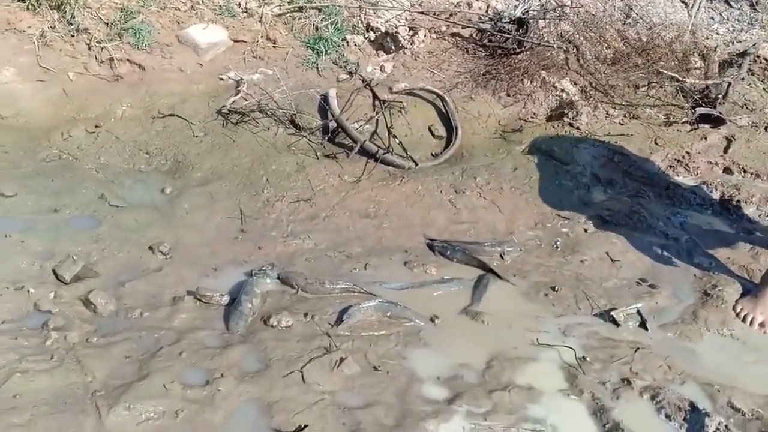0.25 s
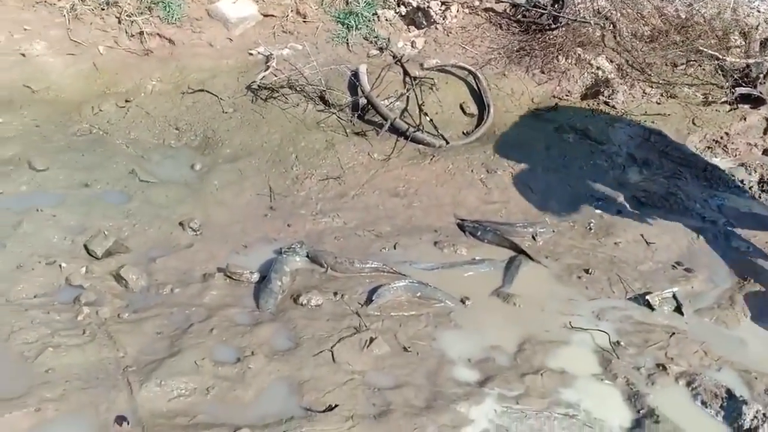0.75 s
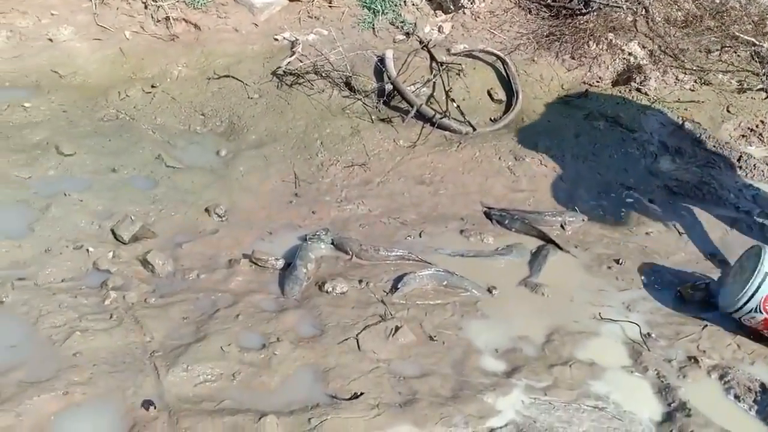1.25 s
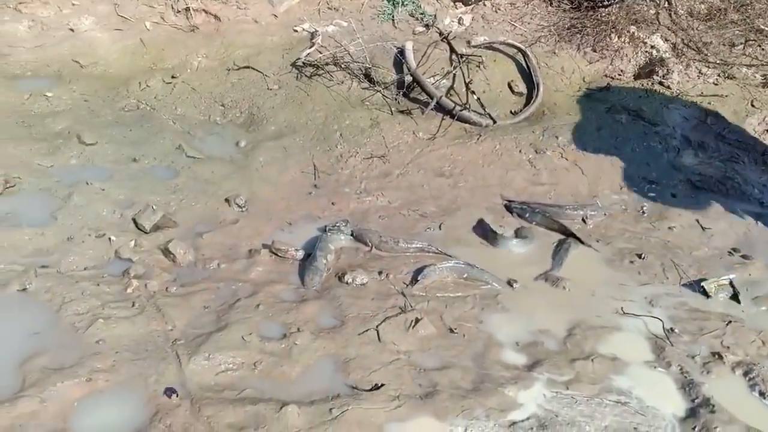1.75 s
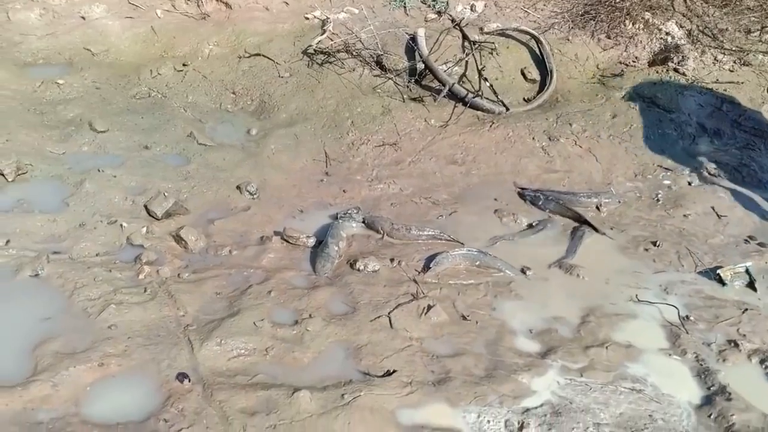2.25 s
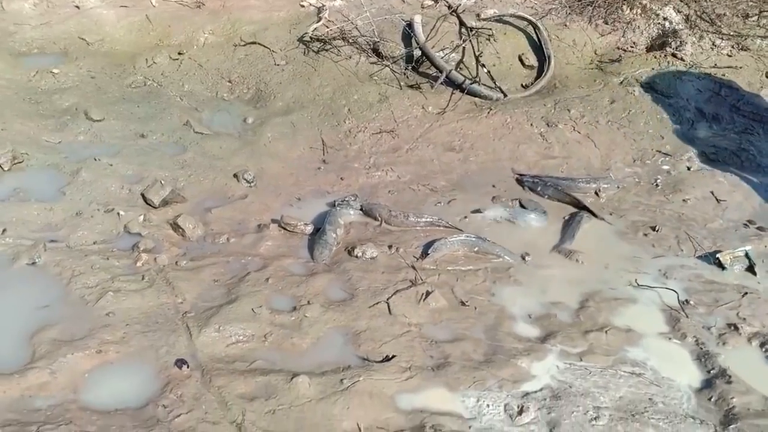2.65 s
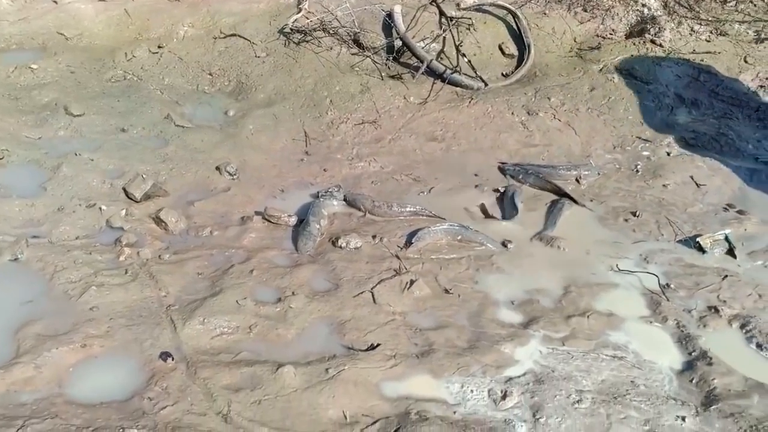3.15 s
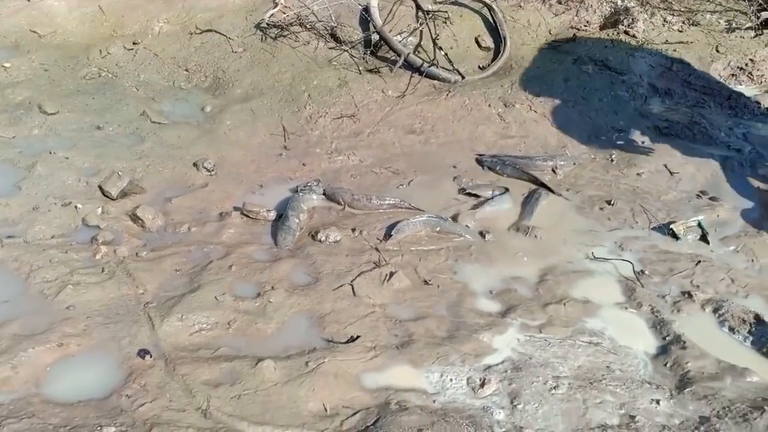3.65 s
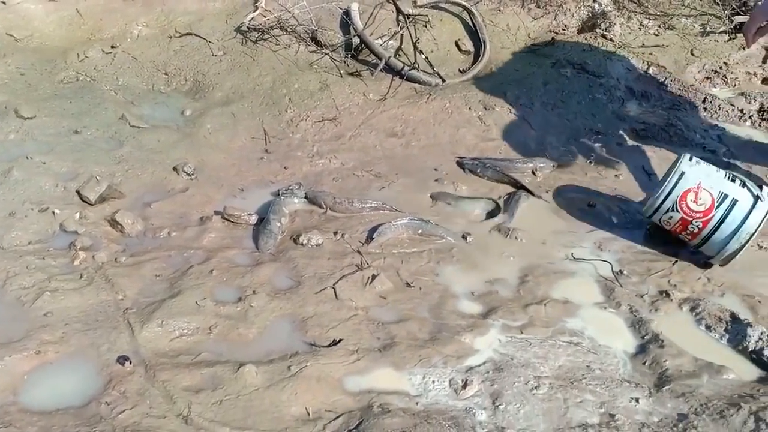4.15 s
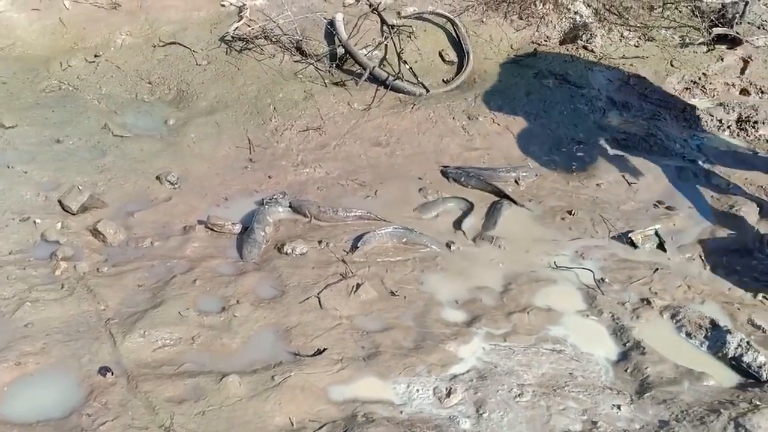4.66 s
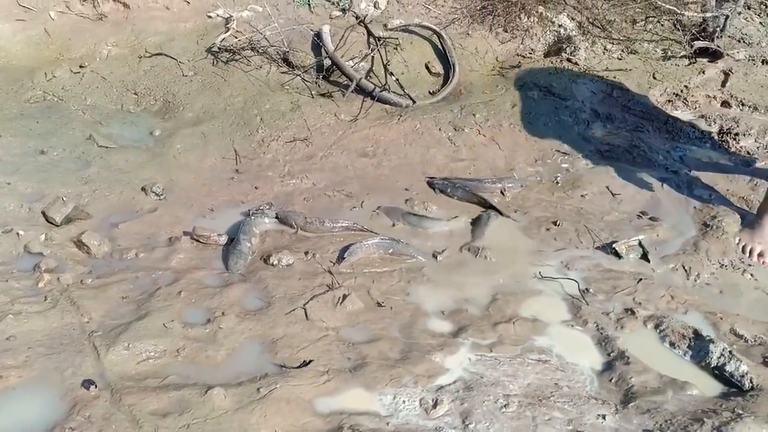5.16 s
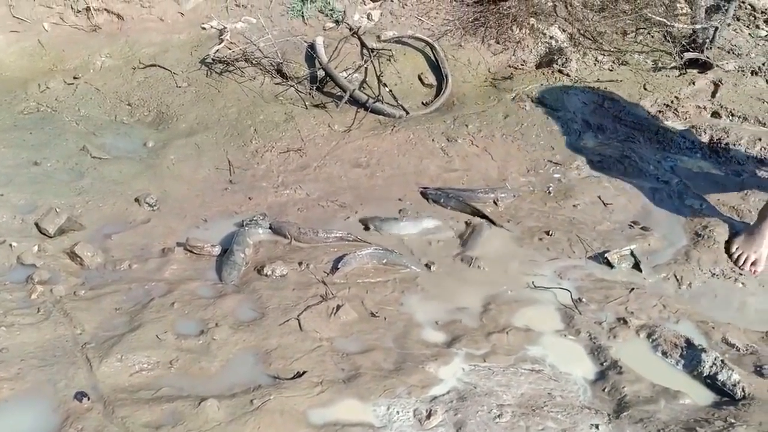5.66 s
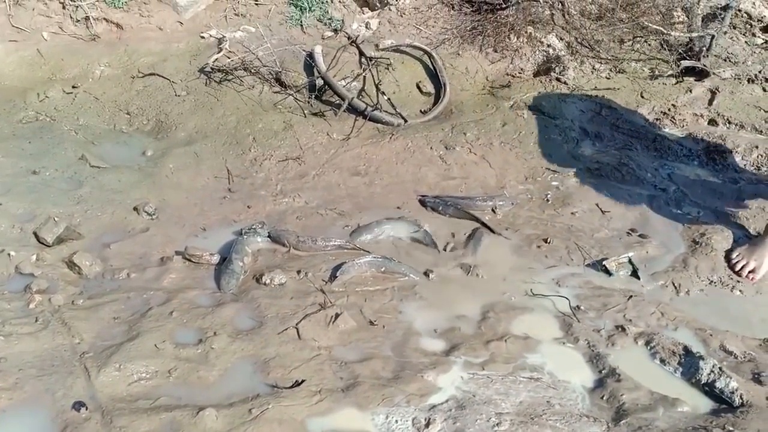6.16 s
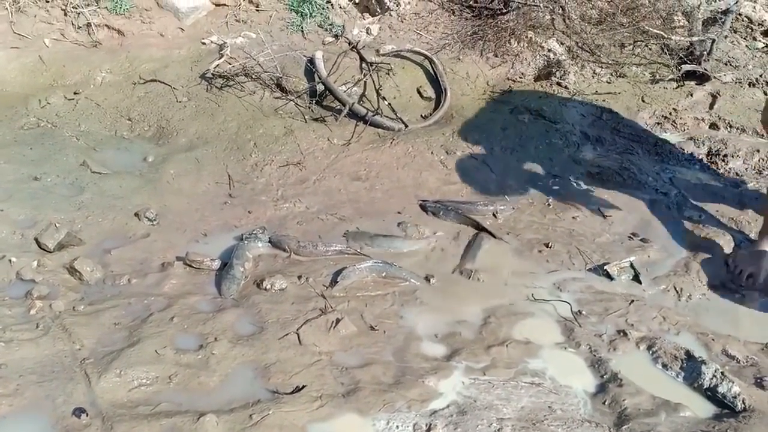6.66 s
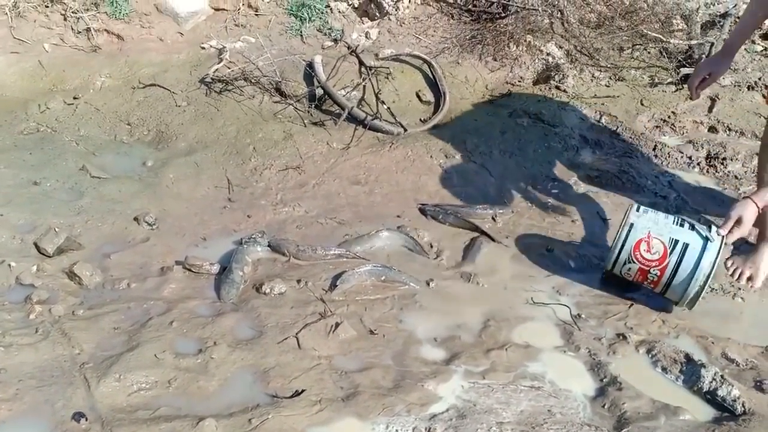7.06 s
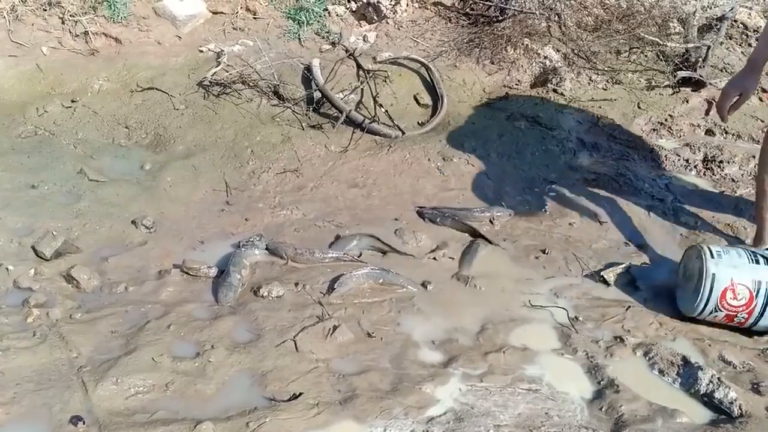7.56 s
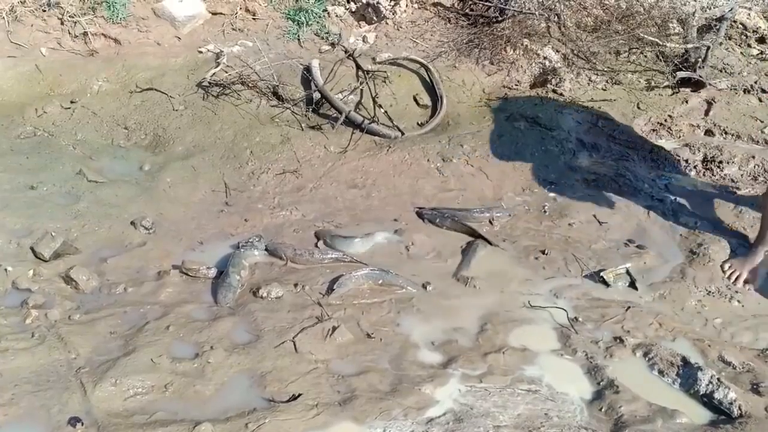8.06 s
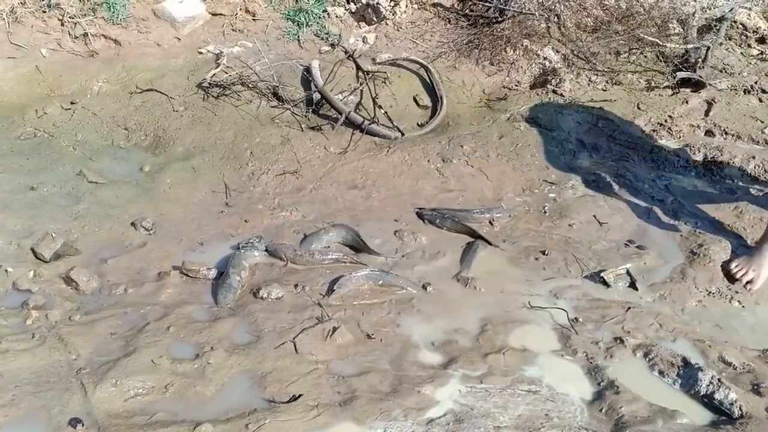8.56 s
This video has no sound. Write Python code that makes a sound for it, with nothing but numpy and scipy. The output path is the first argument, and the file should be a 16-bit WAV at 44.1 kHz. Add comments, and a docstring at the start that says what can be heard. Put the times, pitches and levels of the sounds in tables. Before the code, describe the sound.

Outdoors beside a muddy puddle, a plastic bucket slaps in, scrapes and gurgles as it fills, then throws its water, which patters onto wet mud. The cycle comes three times, about three seconds apart, with single drops and bubble plops between. The last scoop is softer. A close stereo microphone hears the water slightly to the right, with low distant rumble and light wind beneath.

```python
"""Bailing a muddy puddle

A plastic bucket slaps in, scrapes and gurgles full, then flings water that patters down: shaped noise and bubble rings.
Drops tick (treble noise bursts) and bubbles plop (climbing sines) between throws.
Far rumble, drone, light wind on the ports (filtered noise) and one faint bird (gliding sine) lie beneath.
The water is nearer the right microphone port, so the left one hears it later."""
import sys
import numpy as np
from scipy import signal
from scipy.fft import rfft, irfft
from scipy.io import wavfile
from scipy.ndimage import uniform_filter1d, map_coordinates

SR = 44100
rng = np.random.default_rng(int(sys.argv[2]) if len(sys.argv) > 2 else 0)


def materialize(psi):
    """Save the field psi as 16-bit PCM at rate SR to the path in sys.argv[1].

    A 1-D psi becomes a single channel; in a 2-D psi each row is a channel.
    """
    bounded = np.clip(np.atleast_2d(psi).T, -1, 1)
    quanta = np.round(bounded * 32767).astype(np.int16)
    wavfile.write(sys.argv[1], SR, quanta)


N = 388080

# Table levels are nominal: layer trims and filters follow.
# background levels: time_s, wind_db, rumble_db, drone_db
AIR_LEVELS = [(0.0, -80, -53, -58), (0.34, -72, -57, -66), (0.7, -65.5, -61.5, -66), (1.1, -74, -59, -66),
              (1.5, -82, -55, -59), (2.06, -81, -58, -66.5), (2.77, -65.5, -57, -61),
              (3.4, -66.5, -53.5, -63), (3.6, -62, -51.5, -61), (3.95, -66, -45.5, -59.5),
              (4.3, -60, -50.5, -57), (5.15, -55, -54, -65), (5.5, -60, -58, -64), (5.78, -53, -52, -63),
              (6.1, -59.5, -56, -60.5), (6.55, -61.5, -51.5, -63), (6.85, -71.5, -48, -64),
              (7.25, -65.5, -50.5, -60), (7.8, -62.5, -52, -65.5), (8.2, -59.5, -56, -65.5),
              (8.45, -56, -57, -66.5), (8.8, -60, -52, -64.5)]
# wind spectrum: freq_hz, gain_db
WIND_SPECTRUM = [(20, -25), (40, -10), (70, 12), (110, 10), (160, 2.5), (300, -50)]
# far rumble spectrum: freq_hz, gain_db
RUMBLE_SPECTRUM = [(50, -9), (110, 2.5), (200, 2.5), (270, -2.5), (350, -15.5), (600, -43)]
# far drone spectrum: freq_hz, gain_db
DRONE_SPECTRUM = [(200, -41), (350, -0.5), (600, -1.5), (800, -8.5), (1100, -21), (2200, -22.5),
                  (4000, -25.5), (8000, -22), (16000, -19)]
# bird whistle track: time_s, pitch_hz, level_db
BIRD_TRACK = [(6.715, 2920, -92), (6.73, 2890, -63), (6.84, 2835, -64.5), (6.855, 2850, -95)]
# big bubbles: start_s, level_db, pitch_hz, climb_share (after 19 ms), t60_s
PLOPS = [(1.172, -35, 590, 0.05, 0.04), (1.472, -37.5, 775, 0.05, 0.04), (1.497, -35, 750, 0.05, 0.05),
         (1.642, -34.5, 790, 0.05, 0.04), (1.69, -47, 750, 0.05, 0.04), (3.14, -51, 980, 0.11, 0.057),
         (3.637, -27, 1010, 0.23, 0.046), (6.0, -41.5, 620, 0.05, 0.11), (6.1, -42, 700, 0.05, 0.04),
         (3.775, -56, 1460, 0.094, 0.042), (6.2, -32, 1250, 0.52, 0.029), (6.617, -49, 1100, 0.13, 0.071),
         (7.173, -32.5, 630, 0.087, 0.059), (7.22, -36, 616, 0.12, 0.038),
         (7.389, -39.5, 1050, 0.12, 0.043), (7.478, -49.5, 1155, 0.27, 0.081),
         (7.603, -32.5, 1182, 0.047, 0.064), (7.866, -50, 1320, 0.19, 0.046)]
# bucket rim bumping the mud: start_s, level_db
THUDS = [(1.122, -34), (1.758, -38)]
# air glugging in the bucket's mouth: start_s, level_db, pitch_hz, t60_s
GLUGS = [(1.117, -20.5, 306, 0.041), (1.201, -32, 306, 0.033), (1.497, -42, 330, 0.034),
         (1.703, -22.5, 437, 0.021), (1.752, -18.5, 325, 0.033), (1.762, -32, 367, 0.024),
         (1.863, -42, 284, 0.036), (2.309, -39, 340, 0.036), (2.896, -34.5, 327, 0.035),
         (4.045, -28, 380, 0.02), (4.249, -30, 480, 0.022), (4.688, -33.5, 330, 0.043),
         (4.705, -40, 354, 0.076)]
# clear single small bubbles: start_s, level_db, pitch_hz
POPS = [(0.709, -32.5, 2120), (1.092, -32, 5840), (1.114, -17, 1770), (1.616, -38.5, 1900),
        (1.676, -39, 2030), (1.704, -26.5, 2010), (4.243, -11, 2400), (4.557, -13.5, 4130),
        (4.644, -30.5, 4100), (4.692, -43, 1810), (4.773, -38, 2280), (4.789, -40.5, 1950),
        (4.837, -47, 1880), (4.906, -50, 2000), (5.246, -40.5, 1910), (7.011, -31, 2340),
        (7.047, -32, 2150), (7.232, -31, 2260), (7.262, -31, 1660), (7.658, -40, 2060), (7.748, -43, 2230),
        (7.857, -47.5, 1940)]
# water running into or draining from the bucket:
# start_s, level_db, hold_s, drift_db_per_s, gurgle_re_level_db
SCOOPS = [(1.12, -48, 0.53, -14.5, -5.5), (4.05, -48.5, 0.077, -17, -10), (4.3, -55.5, 0.49, -26, -10),
          (4.62, -71, 0.19, -10, -5), (7.01, -57, 0.42, -4.5, -5), (7.5, -57, 0.26, -19, -7.5)]
# flung water falling: start_s, level_db, hold_s, drift_db_per_s, tinkle_re_level_db
FLINGS = [(-0.4, -51.5, 0.7, -9, -3), (2.5, -56.5, 0.48, 14.5, -3.5), (5.52, -51, 0.39, -12.5, -1.5),
          (8.53, -55, .3, 2, -2.5)]
# steady trickle, one value per layer: patter_db, tinkle_db, fizz_db, gurgle_db
TRICKLE_LEVELS_DB = (-71, -79.5, -83.5, -75.5)
# bucket or foot slapping the puddle:
# start_s, level_db, hollow_re_level_db, gulp_re_level_db, spit_re_level_db, t60_s
SLAPS = [(0.709, -32.5, -17, -13, -25.5, 0.069), (0.716, -29.5, -18, -9.5, -10.5, 0.1),
         (1.066, -42, -26, -16, -3, 0.091), (1.09, -15, -23, -9, -4, 0.038),
         (1.106, -14.5, -12.5, -13, -26, 0.1), (1.202, -35, 2.5, -2.5, -31, 0.045),
         (1.223, -23.5, -23, -15, -39, 0.17), (1.338, -28, -19, -17.5, -20.5, 0.25),
         (1.436, -29.5, -19, -16, -16, 0.06), (1.45, -21.5, -39, -36, -14.5, .04),
         (1.464, -29.5, -22, -21, -9, .093), (1.494, -38, -2.5, -9, -2, 0.069),
         (1.539, -30.5, -11, -13, -8.5, 0.079), (1.17, -49, 8, -11, -25, 0.089),
         (1.616, -45.5, 9.5, 2, -28, 0.037), (1.639, -39, -8, -9, -11, 0.043),
         (1.676, -34.5, -13, -10, -21, 0.077), (1.704, -31, 2.5, -11, -34, 0.047),
         (1.752, -26.5, -1, -25, -20, 0.029), (1.76, -41, 8, -17, -20, 0.14),
         (2.363, -38, -14, -17, -31, 0.05), (3.192, -44.5, -3, -7, 3.5, 0.086),
         (3.441, -26, -22, -17, -21, 0.054), (3.45, -33.5, -18, -16, -11.5, 0.14),
         (3.67, -38.5, -17, -22, -10, 0.074), (4.035, -22, -16, -10, -7.5, 0.15),
         (4.044, -24, 0, -1, -9, 0.023), (4.154, -36.5, -24, -1, -27, 0.028),
         (4.175, -30.5, -22, -31, -14, .05), (4.231, -25.5, -8, -10, -7, 0.025),
         (4.243, -11.5, -19, -9.5, -11, 0.025), (4.25, -22, -16, -11, -21, 0.089),
         (4.331, -34, -23, -9, -18, .2), (4.381, -31, -25, -6, -30, 0.059),
         (4.416, -27.5, -17, -5.5, -10.5, 0.032), (4.44, -36, -21, -24, -7, 0.064),
         (4.511, -40, -34, -29, -1.5, .065), (4.53, -23.5, -28, -15.5, -4.5, .11),
         (4.556, -32, -7, -10, -6, 0.032), (3.488, -47, -7, -2, -33, 0.1),
         (8.195, -50, -21.5, -15, -17, 0.11), (5.245, -45, -18.5, -12, -5, 0.048),
         (6.401, -30.5, -16.5, -9.5, -25.5, 0.13), (7.009, -25, -16, -11, -4, 0.037),
         (7.019, -31.5, -18, -6, -8.5, 0.15), (7.046, -36, -14.5, -2, -40, 0.095),
         (7.144, -37.5, -19, -4.5, -10.5, 0.15), (7.172, -35, -6, -6, -12, 0.14),
         (7.214, -31, -18, -11, -15.5, 0.16), (7.26, -30.5, -26, -11.5, -2.5, .099),
         (7.315, -27.5, -33, -25, -27, 0.11), (7.344, -35.5, -37, -8.5, -15, 0.22),
         (7.388, -48, -25, -6, -22, 0.055), (7.473, -39.5, -27, -9, -13, 0.062),
         (7.578, -43, -25, -21, -4, .1), (7.442, -37.5, -20, -12, -35, 0.04),
         (7.527, -39.5, -16, -15.5, -8.5, 0.1), (7.293, -36, -24, -11, -8, 0.11),
         (7.544, -33.5, -30, -29, -9.5, 0.34), (7.599, -27, -9, -7.5, -35, 0.1),
         (7.686, -35.5, -9.5, -12, -26, 0.17)]
# biggest flung blobs landing: start_s, level_db, pop_hz, spit_re_level_db, t60_s
BLOBS = [(0.279, -41.5, 2550, 2, .03), (0.354, -34.5, 2970, -9, 0.05), (0.382, -48.5, 2560, 7.5, 0.095),
         (2.537, -40.5, 2220, -11, 0.07), (2.637, -30, 3040, -18, 0.02), (2.725, -43.5, 2440, -3, .1),
         (2.76, -32, 2040, -31, .05), (2.788, -39, 2400, -29, 0.065), (2.813, -40, 2290, -17, .07),
         (2.856, -34.5, 2040, -28, 0.04), (2.897, -30, 1680, -25, 0.13), (2.931, -28.5, 2220, -16.5, 0.37),
         (2.957, -26.5, 2220, -7.5, 0.048), (2.963, -31.5, 2450, -16.5, .045),
         (3.001, -37.5, 2300, -23.5, .13), (3.032, -36.5, 2080, -19, 0.24),
         (3.072, -39.5, 2340, -11, 0.065), (5.59, -45.5, 2280, -7, .1), (5.607, -38, 2550, -6.5, 0.1),
         (5.625, -34, 2530, -21, 0.053), (5.652, -39, 2620, -22, 0.12), (5.793, -38, 2100, -9.5, 0.13),
         (5.855, -34.5, 2070, -31, 0.067), (5.879, -31, 2080, -33, .05), (5.893, -38, 1990, -28, 0.091),
         (5.983, -43.5, 2070, -7, .05), (6.01, -37.5, 2110, -12, 0.042), (6.032, -42.5, 2080, -16, 0.12),
         (6.05, -36, 1950, -23, 0.036), (6.073, -44.5, 2120, -28, .08), (6.116, -44, 2110, -25, 0.09),
         (6.172, -44, 2100, -11, 0.14), (8.594, -42, 2470, -9, 0.23), (8.629, -37.5, 1800, -21, 0.15),
         (8.74, -49, 3220, 11.5, 0.055)]
# single drops on the mud: start_s, level_db
TICKS = [(0.4704, -49), (0.5556, -53), (0.5741, -50), (0.6187, -42.5), (0.9976, -51), (1.733, -46),
         (1.8943, -44), (1.9096, -37), (3.2886, -35), (3.7205, -47.5), (4.825, -48), (4.9538, -51),
         (5.3138, -55), (5.943, -43), (6.108, -48), (6.285, -53), (7.7875, -50), (7.977, -49),
         (8.1534, -62), (8.41, -57.5)]
# hollow modes of the bucket: freq_hz, width_hz, gain_db
BUCKET_MODES = [(119, 31, -10), (173, 45, -10.5), (315.7, 24.5, 4.5), (501, 116, -0.5), (773, 230, -10)]
# splash body colour: freq_hz, gain_db
BODY_COLOUR = [(500, -28.5), (1200, -10), (1700, -1.5), (2300, 2.5), (3500, -5), (5000, -11), (16000, -19)]
# gulp colour: freq_hz, gain_db
GULP_COLOUR = [(350, -28.5), (700, -1), (950, -8), (1070, 0.5), (1200, -4.5), (1500, -13), (2500, -23)]
# treble spit colour: freq_hz, gain_db
SPIT_COLOUR = [(2000, -17.5), (3500, -5.5), (5000, 3), (9000, 0), (16000, -1.5)]
# spray fizz colour: freq_hz, gain_db
FIZZ_COLOUR = [(2200, -29), (3200, -16), (5000, 8), (9000, 1.5), (16000, 2)]
# water, left-right likeness: freq_hz, likeness_0_to_1
WATER_LIKENESS = [(200, 1), (1000, 0.85), (3000, 0.4), (4200, 0.14), (6000, 0.4), (8000, 0.19)]
# port cavity colour: freq_hz, left_db, right_db
PORT_COLOUR = [(20, -19, -11.5), (55.3, -2, -2.5), (412, -2, -1.5), (860, -0.5, -1), (1040, 3, -1),
               (1410, 1.5, 2.5), (1826, 5.5, -2), (2430, 5.5, 1.5), (2635, 3.5, 0), (3440, -4.5, -5),
               (4640, -8, -7.5), (5855, -3.5, -4), (6350, -14, -12), (10000, -28, -31.5),
               (11600, -25.5, -24), (14500, -22, -26)]

WIND_ALIKE = 0.55  # power share common to both ports
THUD_HZ, THUD_T60_S = 129, 0.14
SCOOP_RISE_S, SCOOP_FALL_DB_PER_S = 0.075, 73.5
FLING_RISE_S, FLING_FALL_DB_PER_S = 0.074, 71
TINKLE_FADE_DB_PER_S = 15  # the finest spray of a fling lands first
SCOOP_TINKLE_DB, SCOOP_FIZZ_DB = -19.5, -15  # re scoop flow
FLING_FIZZ_DB, FLING_GURGLE_DB = -9, -19  # re fling flow
MOUTH_HZ, MOUTH_DB = 1065, -1  # bubble pitch favoured in the scoop flow; re its gurgle
SLAP_POP_HZ, SLAP_POP_DB = 2190, -6  # median pitch; re slap
BLOB_HOLLOW_DB, BLOB_GULP_DB, BLOB_POP_DB = -20.5, -27, 2.5  # re blob
SMALL_SCOOP_DB, SMALL_FLING_DB = 14, 6.5  # small splashes, re flow
SMALL_TRICKLE_DB, SMALL_SPREAD_DB, SMALL_T60_S = -61.5, 1.5, 0.036
TICK_T60_S = 0.019
LAG_S = 0.0004774  # left port hears the water later
TOP_HZ = 15830


def amp(db):
    """dB to linear gain."""
    return np.exp(np.asarray(db) * np.log(10) / 20)


def unit(x):
    """Scale to rms 1."""
    return x / np.sqrt(np.mean(x ** 2) + 1e-20)


def along(points, hz):
    """Interpolate (Hz, value) points on a log axis."""
    freq_hz, value = np.transpose(points)
    return np.interp(np.log(hz + 1), np.log(freq_hz + 1), value)


def curves(rows):
    """One value per sample for each column after the time."""
    time_s, *columns = np.transpose(rows)
    return [np.interp(np.arange(N) / SR, time_s, column) for column in columns]


def wobble(rate_hz, channels=1):
    """Smooth random curves through rate_hz knots a second."""
    knots = rng.standard_normal((channels, int(N * rate_hz / SR) + 4))
    return np.array([map_coordinates(k, [np.arange(N) * rate_hz / SR]) for k in knots])


def filtered(x, response):
    """Multiply the spectrum by a complex response of frequency."""
    size = 2 ** 13 * -(-(N + 8192) // 2 ** 13)
    return irfft(rfft(x, size) * response(np.fft.rfftfreq(size, 1 / SR)), size)[..., :N]


def causal(points):
    """Minimum-phase response from (Hz, dB) points, by folding the cepstrum."""
    grid_hz = np.linspace(0, SR / 2, 4097)
    cepstrum = irfft(np.log(amp(along(points, grid_hz))))
    half = len(cepstrum) // 2
    cepstrum[1:half] *= 2
    cepstrum[half + 1:] = 0
    return lambda hz: np.interp(hz, grid_hz, np.exp(rfft(cepstrum)))


def coloured(x, response):
    """Filter with a response that leaves white noise at the same rms."""
    power = np.mean(np.abs(response(np.linspace(0, SR / 2, 4097))) ** 2)
    return filtered(x, response) / np.sqrt(power)


def steady(spectrum, alike, lag_s):
    """Stereo noise of rms 1; the ports share a part, which reaches the left later."""
    share = np.clip(alike, 0, 1)
    both, left, right = rng.standard_normal((3, N))
    common = np.array([np.roll(both, round(lag_s * SR)), both])
    pair = np.sqrt(share) * common + np.sqrt(1 - share) * np.array([left, right])
    return unit(filtered(pair, lambda hz: amp(along(spectrum, hz))))


def grit(per_s, spread_db):
    """Two strands of uneven tiny impacts on a noise bed: same moments, independent noise."""
    size = amp(spread_db * np.minimum(rng.exponential(size=N), 3))
    impacts = size * (rng.random(N) < per_s / SR)
    return unit(np.hypot(unit(impacts), 0.7) * rng.standard_normal((2, N)))


def bursts(start_s, level_db, t60_s, rise_s):
    """Sum of quick swells that die away; t60 is held within 5-300 ms."""
    out, t = np.zeros(N + SR), np.arange(SR // 5) / SR
    for start, level, life in zip(start_s, level_db, np.clip(t60_s, 0.005, 0.3)):
        shape = amp(-60 * t / life) * (1 - np.exp(-t / rise_s))
        out[round(start * SR):][:len(t)] += amp(level) * shape / shape.max()
    return out[:N]


def rings(start_s, hz, gain, cycles, climb, onset):
    """Two strands of short climbing bubble rings; cycles to -60 dB, onset in cycles."""
    t = np.arange(384)[None] / SR
    turns = hz[:, None] * t
    shape = gain[:, None] * amp(-60 * turns / cycles) * (1 - np.exp(-turns / onset))
    where = (np.round(start_s * SR).astype(int)[:, None] + np.arange(t.size)).ravel()
    strands = []
    # same moments, other phases
    for phase in (np.zeros(len(start_s)), rng.random(len(start_s))):
        wave = shape * np.sin(2 * np.pi * (turns * (1 + climb * turns / cycles) + phase[:, None]))
        strands.append(np.bincount(where, wave.ravel(), N + SR)[:N])
    return np.array(strands)


def swarm(count, hz, spread, spread_db, cycles):
    """Bubbles at random moments around a pitch, of rms 1 together."""
    when, size = rng.random((count, 2)).T
    pitch_hz = hz * np.exp(spread * rng.standard_normal(count))
    gain = amp(spread_db * np.minimum(-np.log(size), 3))
    return unit(rings(when * N / SR, pitch_hz, gain, cycles, climb=0.17, onset=1.2))


def background():
    """Wind buffets the ports unevenly; rumble and drone come from afar."""
    wind_db, rumble_db, drone_db = curves(AIR_LEVELS)
    wind_gain = amp(wind_db + 4.0 + 2.2 * wobble(6, channels=2) + [[1.5], [-1.5]])
    wind = wind_gain * steady(WIND_SPECTRUM, WIND_ALIKE, lag_s=0.0003)
    rumble = amp(rumble_db + 1 + 1.1 * wobble(16)) * steady(RUMBLE_SPECTRUM, 0.92, lag_s=0.00028)
    drone = amp(drone_db + 4.5 + 1.2 * wobble(20)) * steady(DRONE_SPECTRUM, 0.64, lag_s=0.00029)
    return wind + rumble + drone


def bird():
    """One thin, far whistle: a gliding sine, alike at both ports."""
    pitch_hz, level_db = curves(BIRD_TRACK)
    t = np.arange(N) / SR
    sounding = (t > BIRD_TRACK[0][0]) & (t < BIRD_TRACK[-1][0])
    whistle = np.sin(2 * np.pi * np.cumsum(pitch_hz) / SR)
    return amp(level_db) * sounding * whistle * amp([[-5], [-5]])


def bubbles():
    """A big trapped bubble rings bluntly and climbs in pitch near the surface."""
    out, t = np.zeros(N + SR), np.arange(SR // 10) / SR
    for start, level, hz, climb, t60 in PLOPS:
        phase = 2 * np.pi * np.cumsum(hz * (1 + climb * (t / 0.019) ** 2)) / SR
        shape = amp(level - 8.5 - 60 * (t / t60) ** 1.1) * (1 - np.exp(-t / 0.0002))
        out[round(start * SR):][:len(t)] += shape * np.sin(phase)
    # left lags by 7 samples
    return np.array([np.roll(out, 7)[:N] * amp(4.5), out[:N] * amp(3.5)])


def thuds():
    """A soft low push through the mud: a decaying sine on the alike strand."""
    out, t = np.zeros(N + SR), np.arange(SR // 5) / SR
    for start, level in THUDS:
        shape = amp(level - 60 * t / THUD_T60_S) * (1 - np.exp(-t / 0.0036))
        out[round(start * SR):][:len(t)] += shape * np.sin(2 * np.pi * THUD_HZ * t)
    return out[:N] * [[1], [0]]


def glugs():
    """A gulp of air swings a few times, its pitch sagging as the mouth closes."""
    out, t = np.zeros(N + SR), np.arange(SR // 8) / SR
    for start, level, hz, t60 in GLUGS:
        phase = 2 * np.pi * np.cumsum(hz * (1 + 0.19 * np.exp(-t / 0.0014))) / SR
        shape = amp(level + 5.0 - 60 * t / t60) * (1 - np.exp(-t / 0.0013))
        out[round(start * SR):][:len(t)] += shape * np.sin(phase)
    return out[:N] * [[1], [0]]


def pops():
    """Single bubbles ring out of the splashing."""
    start_s, level_db, pitch_hz = np.transpose(POPS)
    return rings(start_s, pitch_hz, amp(level_db), cycles=36, climb=0.018, onset=1.0)


def flows(rows, rise_s, fall_db_per_s, own=False, fade_db_per_s=0):
    """Gain of gushes that rise, hold with a drift and fall; own adds each row's last column."""
    grid_s = np.arange(0, N / SR + 0.001, 0.001)
    gain = np.zeros(len(grid_s))
    for start, level, hold, drift, own_db in rows:
        t = np.maximum(grid_s - start, 0)
        held_db = level + own * own_db + drift * np.minimum(t, hold)
        fall_db = fall_db_per_s * np.maximum(t - hold, 0) + fade_db_per_s * t
        gain += amp(held_db - fall_db) * np.clip(t / rise_s, 0, 1)
    return np.interp(np.arange(N) / SR, grid_s, gain)


def spray():
    """Clumpy flung and running water traps bubbles: tiny ones tinkle, small patter, large gurgle."""
    scoop = flows(SCOOPS, SCOOP_RISE_S, SCOOP_FALL_DB_PER_S)
    fling = flows(FLINGS, FLING_RISE_S, FLING_FALL_DB_PER_S)
    mist = flows(FLINGS, FLING_RISE_S, FLING_FALL_DB_PER_S, True, TINKLE_FADE_DB_PER_S)
    scoop_gurgle = flows(SCOOPS, SCOOP_RISE_S, SCOOP_FALL_DB_PER_S, True)
    layer_flows = [scoop + fling,
                   amp(SCOOP_TINKLE_DB) * scoop + mist,
                   amp(SCOOP_FIZZ_DB) * scoop + amp(FLING_FIZZ_DB) * fling,
                   scoop_gurgle + amp(FLING_GURGLE_DB) * fling]
    patter_gain, tinkle_gain, fizz_gain, gurgle_gain = amp(TRICKLE_LEVELS_DB)[:, None] + layer_flows

    clump, surge = wobble(45), wobble(7)
    patter = coloured(grit(per_s=990, spread_db=-2), causal(BODY_COLOUR))
    patter = patter_gain * amp(-4.5 + 0.83 * clump + 0.5 * surge) * patter
    droplets = swarm(count=2600, hz=2302, spread=0.169, spread_db=2.5, cycles=52)
    droplets = patter_gain * amp(-9.5 + 0.36 * clump + 0.5 * surge) * droplets
    tinkle = swarm(count=2200, hz=3495, spread=0.171, spread_db=2.0, cycles=37)
    tinkle = tinkle_gain * amp(5.0 + 0.56 * clump) * tinkle
    gurgle = swarm(count=1800, hz=1026, spread=0.2, spread_db=2.5, cycles=9.9)
    gurgle = gurgle_gain * amp(1.0 + 1.1 * wobble(30)) * gurgle
    fizz = coloured(grit(per_s=1400, spread_db=1.5), causal(FIZZ_COLOUR))
    fizz = fizz_gain * amp(15.5 + 0.78 * clump + 3.1 * wobble(160)) * fizz
    mouth = swarm(count=600, hz=MOUTH_HZ, spread=0.028, spread_db=0.0, cycles=33)
    mouth = scoop_gurgle * amp(MOUTH_DB) * mouth
    return patter + droplets + tinkle + gurgle + mouth + fizz


def splashes():
    """Slaps, blobs and random small splashes as columns: SLAPS columns, pop_hz, pop_re_level_db."""
    scoop = flows(SCOOPS, SCOOP_RISE_S, SCOOP_FALL_DB_PER_S)
    fling = flows(FLINGS, FLING_RISE_S, FLING_FALL_DB_PER_S)
    flow = amp(SMALL_SCOOP_DB) * scoop + amp(SMALL_FLING_DB) * fling + amp(SMALL_TRICKLE_DB)
    pitch_hz = SLAP_POP_HZ * np.exp(0.041 * rng.standard_normal(len(SLAPS)))
    slaps = [(*row, hz, SLAP_POP_DB) for row, hz in zip(SLAPS, pitch_hz)]
    blobs = [(start, level, BLOB_HOLLOW_DB, BLOB_GULP_DB, spit, t60, hz, BLOB_POP_DB)
             for start, level, hz, spit, t60 in BLOBS]
    small = []
    when_s, luck = rng.random(size=120) * N / SR, rng.standard_normal(size=(120, 5))
    for start, (a, b, c, d, e) in zip(when_s, luck):
        level = 20 * np.log10(flow[int(start * SR)]) + SMALL_SPREAD_DB * a
        hz = SLAP_POP_HZ * np.exp(0.064 * e)
        small.append((start, level, -19 + 5 * b, -15 + 5 * c, -18 + 5 * d, SMALL_T60_S, hz, -1.5))
    return np.transpose(slaps + blobs + small)


def hollow(hz):
    """Bucket resonance: band-pass modes of alternating sign."""
    return sum((-1) ** k * amp(gain_db) * 1j * hz * width / (mode * mode - hz * hz + 1j * hz * width)
               for k, (mode, width, gain_db) in enumerate(BUCKET_MODES))


def patchy(x, depth_db):
    """The surface keeps changing shape: colour shifts in blobs of some 500 Hz and some 25 ms."""
    spectrum = signal.stft(x, nperseg=256)[2]
    field = uniform_filter1d(rng.standard_normal(spectrum.shape[1:]), size=3, axis=0)
    field = uniform_filter1d(field, size=9, axis=1)
    return signal.istft(spectrum * unit(amp(depth_db * unit(field))), nperseg=256)[1][:, :N]


def water():
    """Over the spray, a slap throws grit, gulps, spits, booms in the bucket and pops; drops only tick."""
    start_s, level_db, hollow_db, gulp_db, spit_db, t60_s, pop_hz, pop_db = splashes()
    body = bursts(start_s, level_db - 13.0, t60_s, rise_s=0.0032) * grit(per_s=2500, spread_db=2.0)
    body = coloured(body, causal(BODY_COLOUR))
    gulp = bursts(start_s, level_db + gulp_db, 1.05 * t60_s, rise_s=0.00063)
    gulp = coloured(gulp * rng.standard_normal((2, N)), causal(GULP_COLOUR))
    tick_s, tick_db = np.transpose(TICKS)
    treble = bursts(start_s, level_db + spit_db + 8.5, 0.77 * t60_s, rise_s=0.00036)
    treble += bursts(tick_s, tick_db + 6.5, np.full(len(TICKS), TICK_T60_S), rise_s=0.00037)
    spit = coloured(treble * grit(per_s=3100, spread_db=1), causal(SPIT_COLOUR))
    boom = bursts(start_s, level_db + hollow_db - 0.5, 0.93 * t60_s, rise_s=0.00047)
    boom = coloured(boom * rng.standard_normal((2, N)), hollow)
    # higher-pitched pops get more level, before the port colour dulls them
    pop_gain = amp(level_db + pop_db + 10 * np.log2(pop_hz / 2200))
    popped = rings(start_s, pop_hz, pop_gain, cycles=37.4, climb=0.016, onset=0.99)
    return patchy(body + gulp + spit + boom + spray(), depth_db=3) + popped


def at_ports(strands):
    """One strand reaches both ports alike, the scattered one with opposite signs; left lags."""
    def split(hz):
        angle = np.arccos(np.clip(along(WATER_LIKENESS, hz), 0, 1)) / 2
        return np.array([np.cos(angle), np.sin(angle)])

    alike, scattered = filtered(strands, split)
    return np.array([np.roll(alike + scattered, round(LAG_S * SR)), alike - scattered])


def scene():
    """Water through the port geometry, over bubbles, bird and background."""
    near = at_ports(water() + pops() + glugs() + thuds())
    return near + bubbles() + bird() + background()


def record(dry):
    """Each port has its cavity colour; electronics hiss faintly and cut all above the band limit."""
    hz, left_db, right_db = np.transpose(PORT_COLOUR)
    ports = np.array([filtered(x, causal(np.transpose([hz, gain_db])))
                      for x, gain_db in zip(dry, (left_db, right_db))])
    hiss = amp(-77.0) * rng.standard_normal(dry.shape)
    return filtered(ports + hiss, lambda f: f < TOP_HZ)


dry = scene()
out = record(dry)
materialize(out)
```